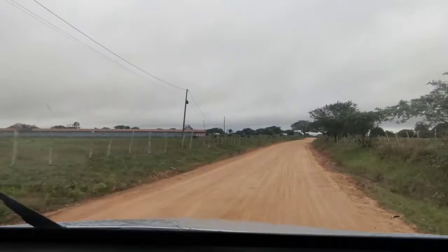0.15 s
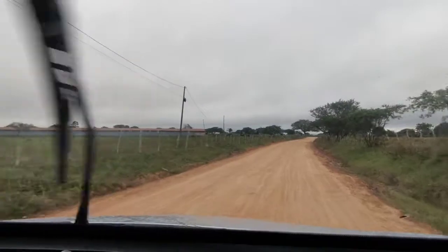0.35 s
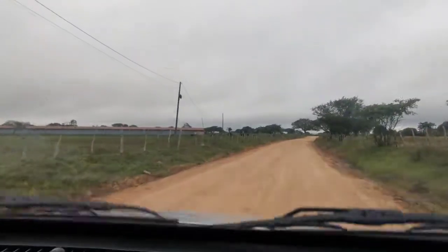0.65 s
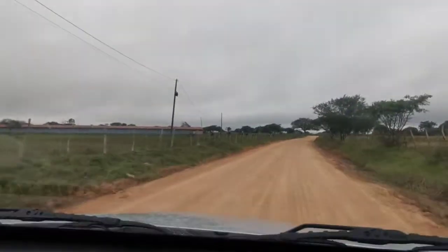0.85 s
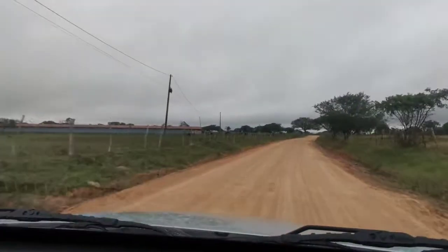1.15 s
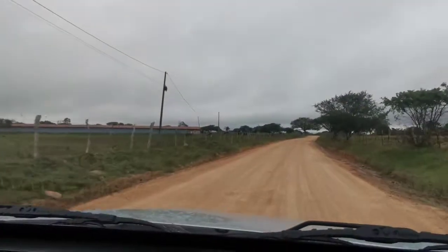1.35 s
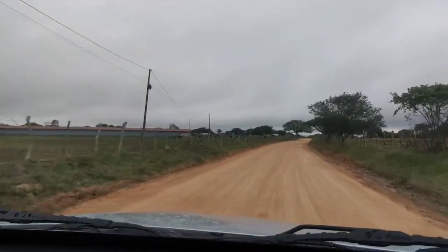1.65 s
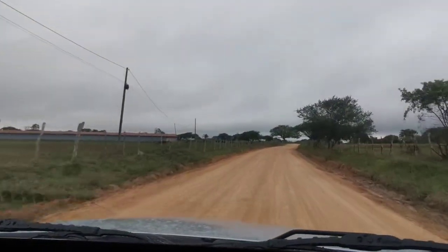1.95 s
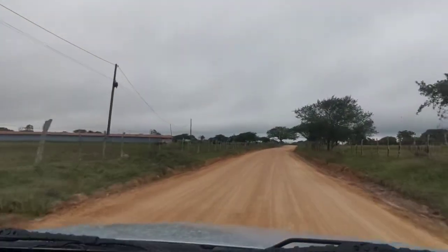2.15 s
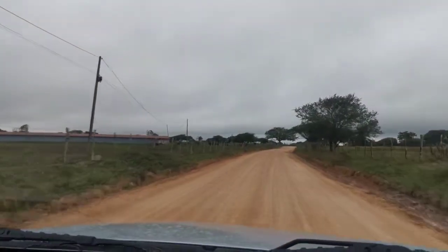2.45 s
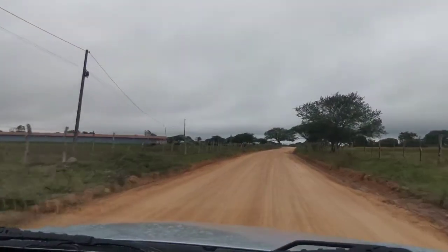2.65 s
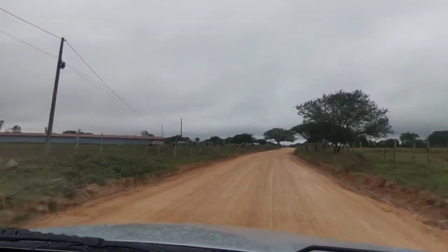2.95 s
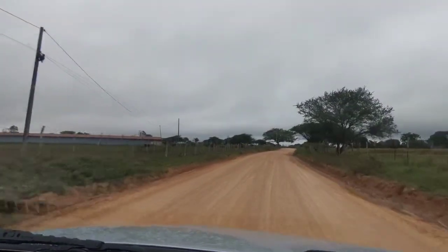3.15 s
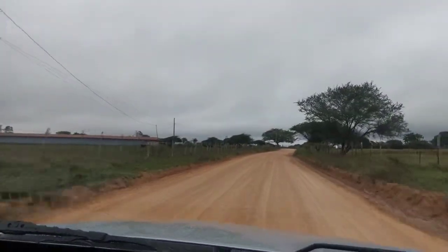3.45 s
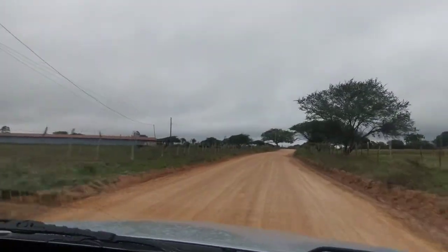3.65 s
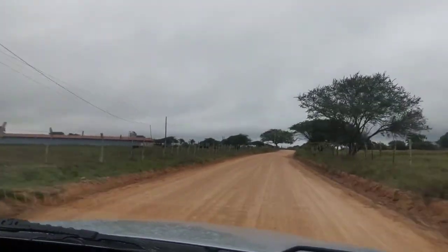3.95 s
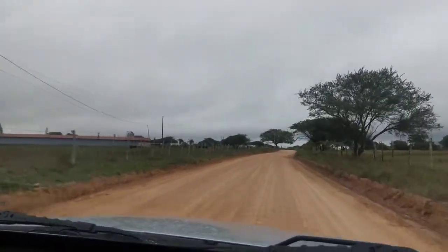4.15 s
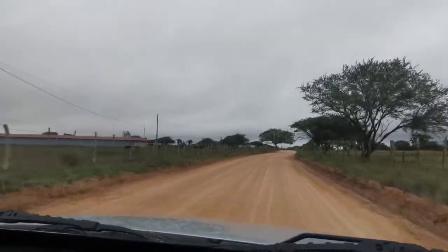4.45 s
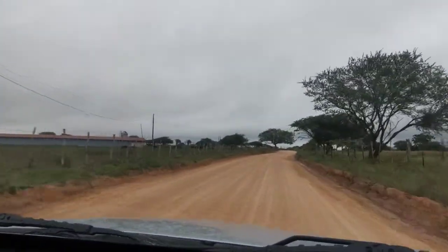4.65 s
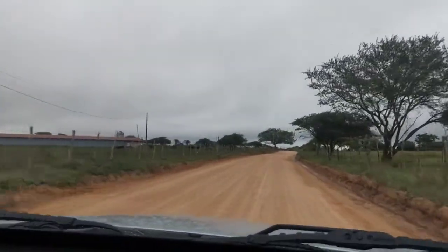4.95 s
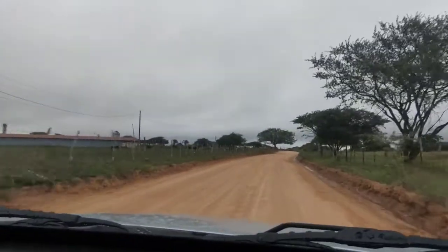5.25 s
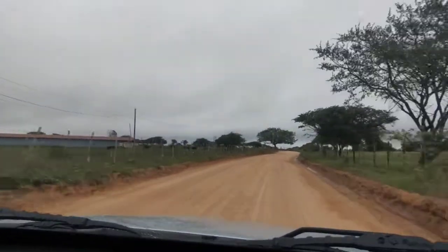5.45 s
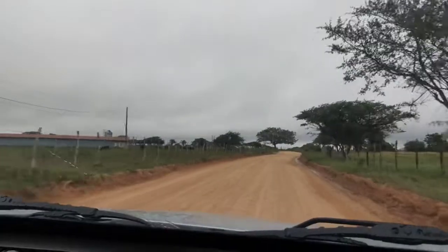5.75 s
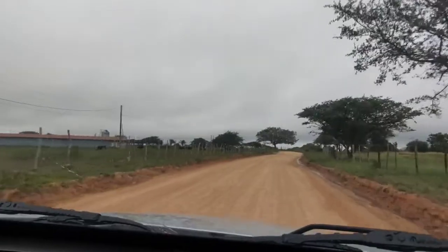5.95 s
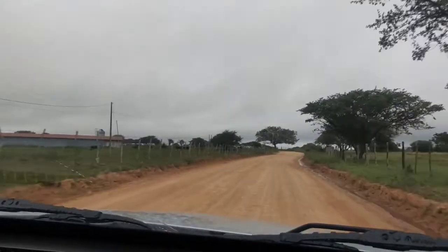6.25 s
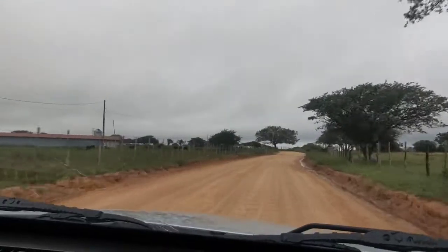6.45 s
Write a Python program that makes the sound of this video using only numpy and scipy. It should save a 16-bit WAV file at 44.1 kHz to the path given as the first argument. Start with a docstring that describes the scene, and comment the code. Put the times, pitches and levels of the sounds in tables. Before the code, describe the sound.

Inside a car on a dirt road, a wiper squeaks and stops with a snap, then low rumble grows into banging, chattering rattles.

```python
"""Car on a washboard road

Inside a car that rolls from smooth dirt onto washboard ripples. Coloured noise, louder on rough dirt,
makes the road boom, roar and fizz. Fading tones make the bumps, the knocks and the ring of a loose piece
of trim that chatters. Short puffs of noise make ticks, wiper squeaks and, with tones, a switch snap.
"""
import sys
import numpy as np
from scipy import signal
from scipy.fft import rfft, irfft
from scipy.io import wavfile
from scipy.ndimage import uniform_filter1d

SR = 44100
rng = np.random.default_rng(int(sys.argv[2]) if len(sys.argv) > 2 else 0)


def unload_audio(sound):
    """Save the sound as a 16-bit wav file, at the path given as the first command line argument."""
    columns = np.transpose(np.atleast_2d(sound))
    # keep every value between -1 and 1, then stretch to whole-number steps
    steps = np.round(np.clip(columns, -1, 1) * 32767)
    wavfile.write(sys.argv[1], SR, steps.astype(np.int16))


N = 291060


def amp(db):
    """Turns decibels into a plain loudness factor."""
    return 10 ** (np.asarray(db) / 20)


def evened(x):
    """Scales a sound to a mean (RMS) level of 1."""
    return x / np.sqrt(np.mean(x ** 2) + 1e-20)


def peaked(x, db):
    """Scales a sound so that its highest peak has this level."""
    return amp(db) * x / abs(x).max()


def read(points, hz):
    """Reads a curve between its points, with pitch spaced as the ear hears it (logarithmic)."""
    point_hz, value = np.transpose(points)
    return np.interp(np.log(hz + 1), np.log(point_hz + 1), value)


def add(mix, s, sound):
    """Lays a sound into the mix from second s on and cuts what runs past the end."""
    part = mix[:, round(s * SR):][:, :sound.shape[1]]
    part += sound[:, :part.shape[1]]


def colour(x, points):
    """Filters a sound by a spectrum in dB."""
    n = x.shape[-1]
    return irfft(rfft(x) * amp(read(points, np.fft.rfftfreq(n, 1 / SR))), n)


def burst(spectrum, t60, rise_s, alike):
    """A short puff of coloured noise, partly shared by both sides; it fades by 60 dB in t60 seconds."""
    t = np.arange(4096) / SR
    left, other = rng.standard_normal((2, 4096))
    alike = np.clip(alike, -1, 1)
    right = alike * left + np.sqrt(1 - alike ** 2) * other
    noise = colour(np.array([left, right]), spectrum)
    return noise * amp(-60 * t / t60) * -np.expm1(-t / rise_s)


def rings(modes, rise_s, spread_db):
    """A struck part rings its modes, a little differently at each blow; each side hears its own mix."""
    t = np.arange(2048) / SR
    hz, width_hz, *side_db = np.transpose(modes)[:, :, None]
    lag_s = np.array([.00045, 0])[:, None, None]  # the left side lies farther away
    size = amp(np.array(side_db) + spread_db * rng.standard_normal(hz.shape))
    fade = np.exp(-np.pi * width_hz * t)  # a wider mode dies sooner
    blow_hz = hz * rng.normal(1, .008, hz.shape)
    tones = size * fade * np.sin(2 * np.pi * blow_hz * (t - lag_s))
    return tones.sum(1) * -np.expm1(-t / rise_s)


def surge(t, s, length, db, tail):
    """Sum of bell-shaped swells in dB, one for each event; the falling side is stretched by tail."""
    late = (t[:, None] - s) / (length / 2)
    late = np.where(late > 0, late / tail, late)
    return (db * np.exp(-late ** 2)).sum(1)


# how rough the dirt is along the way: time_s, roughness_db
ROUGHNESS = [(0, -1.5), (1.3, 1), (1.95, 3.5), (2.25, 5.5), (2.95, 8), (3.5, 9.5), (4.35, 10), (4.9, 17),
             (5.7, 13), (6.6, 18)]
# ridges that shake the whole car: crest_s, length_s, bass_surge_db, treble_surge_db
JOLTS = [(2.124, 0.065, 4, 4), (2.428, 0.19, 6.5, 13.5), (2.759, 0.16, 6.5, 12.5), (3.083, 0.17, 5, 9.5),
         (3.345, 0.18, 2.5, 3), (3.633, 0.11, 7.5, 10.5), (3.736, 0.13, 3.5, 10), (3.954, 0.1, 5.5, 4.5),
         (4.074, 0.1, 0.5, 5.5), (4.171, 0.15, 8, 5), (4.462, 0.099, 4.5, 7), (4.797, 0.23, 2, 6.5),
         (5.098, 0.52, -2, 2.5), (5.358, 0.28, -1, 3), (5.594, 0.11, 5, 4), (5.83, 0.11, 3, 2),
         (6.101, 0.14, 2.5, 10), (6.262, 0.19, -1, 5.5), (6.59, 0.091, 1, 11)]
JOLT_TAIL = 1.3  # a surge falls this many times slower than it rises
# drag of the wiper blade over the glass: crest_s, length_s, surge_db
WIPER_DRAG = [(0.057, 0.27, 10), (0.29, 0.145, 6.5), (0.55, 0.45, 4), (0.222, 0.041, 3.5), (.85, 0.2, 12)]


def shaking(t):
    """The controls of the road noise: roughness, bass surge, treble surge and wiper drag, in dB."""
    s, length, bass_db, treble_db = np.transpose(JOLTS)
    return np.array([np.interp(t, *np.transpose(ROUGHNESS)),
                     surge(t, s, length, bass_db, JOLT_TAIL),
                     surge(t, s, length, treble_db, JOLT_TAIL),
                     surge(t, *np.transpose(WIPER_DRAG), tail=0.8)])


# how alike the noise is on both sides: pitch_hz, likeness (1 same, 0 unrelated, below 0 opposed)
SIDE_LIKENESS = [(40, 0.97), (130, 0.99), (290, 0.79), (640, 0.15), (1410, -0.074), (3100, -0.099),
                 (6820, 0.26), (15000, -0.44)]
# patches and flicker shrink to this share on smooth dirt and are full on dirt this rough
CALM_SHARE, CALM_DB = .3, 9


def wash(spectrum, law, patchy_db, flicker_db, size):
    """Two-channel noise with random patches and a flicker shared by all pitches, its level set by shaking."""
    frames, hz = 4 * N // size + 5, np.fft.rfftfreq(size, 1 / SR)
    a, b, c, d, patches = rng.standard_normal((frames, len(hz), 5)).T
    patches = uniform_filter1d(uniform_filter1d(patches, size=6, axis=0), size=6, axis=1)
    patches = evened(patches)
    flicker = evened(uniform_filter1d(rng.standard_normal(frames), size=3))
    same = np.clip(read(SIDE_LIKENESS, hz), -1, 1)[:, None]
    left = a + 1j * b
    right = same * left + np.sqrt(1 - same ** 2) * (c + 1j * d)
    frame_s = np.arange(frames) * size / 4 / SR
    rough = np.clip(np.interp(frame_s, *np.transpose(ROUGHNESS)) / CALM_DB, CALM_SHARE, 1)
    unrest_db = rough * (patchy_db * patches + flicker_db * flicker)
    z = np.array([left, right]) * amp(read(spectrum, hz)[:, None] + unrest_db)
    noise = evened(signal.istft(z, nperseg=size, noverlap=size - size // 4)[1][:, :N])
    t = np.arange(0, N + 128, 128) / SR
    level_db = law[0] + np.dot(law[1:], shaking(t))
    return noise * amp(np.interp(np.arange(N) / SR, t, level_db))


# colours of the road noise, from the deepest layer to the brightest: pitch_hz, level_db (per Hz, relative)
HEAVE = [(15, -64), (38, -5.5), (53, -6), (64, -13), (113, -2), (135, -8), (180, -16.5), (300, -90)]
BOOM = [(90, -16.5), (130, -7), (158, -11.5), (171, -0.5), (184, -7.5), (240, -8), (290, -18), (340, -21),
        (500, -79)]
ROAR = [(150, -38), (270, 0.5), (400, -5.5), (550, -9), (760, -12), (950, -21), (1300, -27), (2500, -64)]
BUZZ = [(530, -33), (900, -12), (1050, -11), (1400, 2), (1900, -6.5), (2450, -4.5), (3200, -12),
        (4200, -15), (5500, -29), (9000, -64)]
FIZZ = [(2700, -8), (4500, -5), (7000, -5.5), (9200, -6.5), (10400, -5.5), (12300, -9), (13500, -18),
        (14800, -15), (15800, -59)]
# how each layer follows the shaking: base_level_db, then the shares (no unit) of
# roughness, bass_surge, treble_surge, wiper_drag
HEAVE_LAW = (-31.5, 0.8981, 0.95, -0.2039, 0.44)
BOOM_LAW = (-32.5, 0.9391, 0.98, 0.0623, -0.1)
ROAR_LAW = (-45.5, 1.0222, 0.73, 0.3872, 0.41)
BUZZ_LAW = (-58.5, 0.79, 0, 1.05, 0.89)
FIZZ_LAW = (-66.5, 0.6032, -0.36, 1.06, 0.63)
SWISH_DB, SWISH_END_S = 3.5, 0.91  # the fizz is louder while the blade sweeps, the buzz by half as many dB


def road():
    """Heave, body boom, tyre roar, buzzing panels and fizz follow the rough dirt, jolts and wiper drag."""
    swish_db = SWISH_DB * np.clip((SWISH_END_S - np.arange(N) / SR) * 10, 0, 1)
    heave = wash(HEAVE, HEAVE_LAW, patchy_db=0.46, flicker_db=0.36, size=4096)
    boom = wash(BOOM, BOOM_LAW, patchy_db=1.1, flicker_db=1.8, size=8192)
    roar = wash(ROAR, ROAR_LAW, patchy_db=.5, flicker_db=1.1, size=512)
    buzz = wash(BUZZ, BUZZ_LAW, patchy_db=4.0, flicker_db=0.5, size=256) * amp(swish_db / 2)
    fizz = wash(FIZZ, FIZZ_LAW, patchy_db=2.0, flicker_db=3.0, size=256) * amp(swish_db)
    return heave + boom + roar + buzz + fizz


JUDDER_PER_S, JUDDER_DB = 170, -56.5  # slips of the dragging blade; level before drag and chance add to it


def judder():
    """The dragging blade slips unevenly: small dull cracks that swell with the drag."""
    step_s = .002
    out, t = np.zeros((2, N)), np.arange(0, 1, step_s)
    luck, size = rng.random((len(t), 2)).T
    drag_db = shaking(t)[3]
    peak_db = JUDDER_DB + drag_db + 10 * size ** 2
    slips = (luck < JUDDER_PER_S * step_s) & (drag_db > 5)
    for s, db in np.transpose([t, peak_db])[slips]:
        crack = peaked(burst(BUZZ, t60=0.018, rise_s=0.00089, alike=0.25), db)
        dull = peaked(burst(ROAR, t60=0.047, rise_s=0.0019, alike=0.67), db + 9)
        add(out, s, crack + dull)
    return out


# squeaks of wiper rubber on glass, later of rubbing trim:
# start_s, peak_db, pitch_hz, width_hz, fade_s (time to fade by 60 dB)
SQUEAKS = [(0.004, -42, 7800, 4500, .2), (0.05, -39.5, 7940, 2900, 0.11), (.112, -31.5, 8000, 1600, 0.032),
           (0.307, -34.5, 10400, 2963, 0.088), (.335, -44, 9900, 7020, 0.037),
           (0.429, -38, 10550, 6156, 0.02), (.758, -36, 7700, 1200, 0.022),
           (0.773, -31.5, 7600, 2484, 0.06), (0.795, -29.5, 9600, 3500, 0.047),
           (.812, -29.5, 9800, 3300, 0.044), (0.835, -29.5, 2480, 690, 0.022),
           (0.863, -37, 2360, 600, 0.087), (0.881, -37.5, 2940, 14000, 0.019),
           (0.051, -35.5, 2030, 972, 0.045), (0.174, -36.5, 1500, 1700, 0.018),
           (0.295, -38, 1500, 4200, 0.032), (1.68, -43, 1970, 2808, 0.04), (4.17, -39, 905, 30, .6),
           (4.242, -39, 913, 30, .6), (4.865, -25.5, 1566, 260, 0.031), (5.885, -30, 1650, 290, 0.056),
           (6.474, -28, 1358, 39.96, 0.078)]
# the switch and its rebounds: start_s, peak_db (of the noise part)
SNAPS = [(1.0925, -28), (1.0948, -12.5), (1.107, -27), (1.1139, -27), (1.124, -41), (1.134, -40)]
# colour of the switch noise: pitch_hz, level_db (per Hz, relative)
SWITCH = [(700, -40), (1100, -14.5), (1800, -12.5), (2300, -3), (3000, -9.5), (4800, -13.5), (10600, -9.5),
          (14500, -23), (15600, -36)]
# ringing body of the switch: pitch_hz, width_hz, left_db, right_db (relative)
SWITCH_BODY = [(256, 115, -5, 4), (364, 104, 4, 2.5), (607, 73, 3, 3), (2280, 230, 3, -5)]


def wiper():
    """Squeaks are narrow puffs of noise; the switch is a broad snap that rebounds and rings its body."""
    out, f = np.zeros((2, N)), np.geomspace(100, 20000, 300)
    for s, db, hz, width_hz, t60 in SQUEAKS:
        squeak = np.transpose([f, -18 * np.log10(1 + (2 * (f - hz) / width_hz) ** 4)])
        add(out, s, peaked(burst(squeak, t60, rise_s=0.0064, alike=0.41), db))
    for s, db in SNAPS:
        add(out, s, peaked(burst(SWITCH, t60=.03, rise_s=.0015, alike=.3), db))
        add(out, s, peaked(rings(SWITCH_BODY, rise_s=0.0027, spread_db=2.0), db - 1.5))
    return out


STIR_DB, LIGHT_SPREAD_DB = 6, 3  # faint ticks need dirt rougher than this; their levels vary up and down


def scattered(per_s, db):
    """Chance events on rough dirt, stronger where the car shakes more: rows of start_s, peak_db."""
    t = np.arange(0, N / SR, .01)
    luck, place = rng.random((len(t), 2)).T
    rough_db, bass_db, treble_db, drag_db = shaking(t)
    peak_db = db + rough_db + .5 * treble_db + LIGHT_SPREAD_DB * (2 * place - 1)
    chosen = (luck < per_s / 100) & (rough_db > STIR_DB)
    return np.transpose([t, peak_db])[chosen].tolist()


# bright ticks of small parts: start_s, peak_db (of the first touch)
TICKS = [(2.018, -46), (2.7102, -32.5), (2.746, -32.5), (3.4223, -37), (3.62, -35), (3.658, -33.5),
         (3.7185, -33), (4.0593, -32.5), (4.7591, -32.5), (4.792, -29), (4.836, -37), (4.8686, -28),
         (4.9968, -28.5), (5.0778, -39), (5.208, -34.5), (5.291, -37), (5.4654, -28), (5.4964, -34),
         (5.557, -37.5), (5.5817, -31.5), (5.8865, -29), (5.9194, -43), (5.9908, -40), (6.051, -31.5),
         (6.1087, -27.5), (6.1813, -37), (6.2562, -40), (6.321, -35), (6.4845, -36)]
FAINT_PER_S, FAINT_DB = 8, -62  # chance ticks; level before the shaking adds to it
# a tick's touches spread this long, fade up to this much and differ in colour
JINGLE_S, JINGLE_DB, JINGLE_TINT_DB = .024, -6, 4


def ticks():
    """Hard little parts jingle together: a few quick puffs of bright noise, each with its own colour."""
    out, (hz, level_db) = np.zeros((2, N)), np.transpose(FIZZ)
    for s, db in list(TICKS) + scattered(FAINT_PER_S, FAINT_DB):
        for late in np.append(0, rng.random(size=3)):
            tint = np.transpose([hz, level_db + JINGLE_TINT_DB * rng.standard_normal(len(hz))])
            touch = burst(tint, t60=.033, rise_s=.0022, alike=.05)
            add(out, s + JINGLE_S * late, peaked(touch, db + JINGLE_DB * late))
    return out


# stones and ridges under the wheels, and the wiper arm coming to rest:
# start_s, level_db (5.5 dB above the peak that is played), pitch_hz
BUMPS = [(0.821, -14.5, 117), (0.876, -20, 112), (1.117, -18.5, 122), (1.441, -15, 174),
         (2.381, -3.5, 158.5), (2.73, -2.5, 103), (3.36, -15, 154), (3.611, -13, 142), (4.173, -5, 177.4),
         (4.426, -6.5, 186), (4.985, -2.5, 165), (5.267, -7, 163), (5.658, -3, 174), (5.927, -8, 183),
         (6.133, -1, 166), (6.446, -5, 146), (2.092, -6, 164.7), (2.342, 2, 187.2), (2.98, -5, 200),
         (4.479, -1, 179), (3.641, -8.5, 150), (4.771, -12, 150), (5.087, 2.5, 177.2), (5.22, -7, 170),
         (6.173, -1, 166), (6.37, 1, 192.5)]


def bumps():
    """Each bump rings the floor pan for a few cycles: one low tone that fades fast, same on both sides."""
    out, t = np.zeros((2, N)), np.arange(8192) / SR
    for s, db, hz in BUMPS:
        ring = np.sin(2 * np.pi * hz * t) * amp(-60 * t / 0.074) * -np.expm1(-t / 0.0067)
        add(out, s, peaked(ring * np.ones((2, 1)), db - 5.5))
    return out


# hard knocks that the wiper arm and the suspension pass into the dashboard: start_s, peak_db
KNOCKS = [(0.793, -26), (.838, -26.5), (0.886, -32), (2.415, -18.5), (2.714, -22), (2.731, -16.5),
          (2.751, -16.5), (3.082, -23), (3.315, -21), (3.632, -12), (3.719, -17), (3.918, -29),
          (4.192, -18.5), (4.452, -18.5), (4.783, -12), (5.131, -14.5), (5.312, -16), (5.631, -20),
          (5.828, -23), (6.081, -12.5), (6.233, -14.5), (6.517, -18)]
# higher, hollow knocks of the upper dashboard: start_s, peak_db
CLUNKS = [(.097, -28), (.92, -32), (1.812, -34), (2.428, -26), (3.422, -23.5), (3.614, -15.5),
          (6.041, -17.5), (6.124, -17), (6.333, -20)]
# ringing modes of the dashboard: pitch_hz, width_hz, left_db, right_db (relative)
DASHBOARD = [(327.3, 25, -3.5, 2.5), (433, 46, 0.5, -2), (580, 49, -12, -3.5), (726, 55, -6.5, -11)]


def knocks():
    """Each knock rings the dashboard briefly; the hollow ones ring only its upper modes."""
    out = np.zeros((2, N))
    for events, modes in ((KNOCKS, DASHBOARD), (CLUNKS, DASHBOARD[2:])):
        for s, db in events:
            add(out, s, peaked(rings(modes, rise_s=.0015, spread_db=3), db))
    return out


# strong blows of the loose trim: start_s, nominal_peak_db (BLOW_CREST_DB sets the mean level below it)
CHATTER = [(2.186, -38), (2.2935, -37.5), (2.3543, -21), (2.423, -34), (2.4982, -33), (2.5461, -29.5),
           (2.7125, -21.5), (2.743, -21), (2.7971, -27.5), (2.8548, -32.5), (2.9922, -26), (3.041, -36),
           (3.0744, -25.5), (3.113, -26.5), (3.1486, -32.5), (3.2442, -29.5), (3.278, -26), (3.3116, -34),
           (3.3464, -26.5), (3.4257, -30.5), (3.614, -29.5), (3.6539, -38), (3.69, -38), (3.7257, -24.5),
           (3.7688, -22.5), (3.8073, -22.5), (3.8862, -30.5), (4.1155, -23), (4.154, -27), (4.189, -23.5),
           (4.3685, -29), (4.4134, -35), (4.4442, -23), (4.487, -23), (4.535, -22), (4.577, -26),
           (4.62, -23), (4.6674, -23.5), (4.726, -25), (4.7507, -28.5), (4.7915, -21.5), (4.8266, -30),
           (4.8618, -29), (4.867, -29), (4.92, -29), (4.934, -26), (4.9776, -24.5), (5.0048, -25.5),
           (5.0748, -26.5), (5.129, -27.5), (5.1516, -24), (5.178, -30), (5.222, -19.5), (5.2631, -26),
           (5.3465, -29.5), (5.386, -26.5), (5.4443, -27.5), (5.491, -26.5), (5.5512, -34), (5.589, -21.5),
           (5.6338, -23.5), (5.663, -24.5), (5.723, -21.5), (5.7588, -26.5), (5.8028, -31.5),
           (5.8406, -20.5), (5.8895, -25.5), (5.8965, -23.5), (5.9198, -35), (5.9572, -30), (6.0113, -27.5),
           (6.0623, -31), (6.0868, -26), (6.102, -21), (6.1378, -23), (6.1812, -28), (6.2184, -27.5),
           (6.256, -26.5), (6.3014, -31), (6.3355, -28), (6.3774, -28), (6.4034, -32), (6.4375, -25.5),
           (6.479, -26), (6.511, -24), (6.5537, -27.5)]
# ringing modes of the trim: pitch_hz, width_hz, left_db, right_db (relative)
TRIM = [(1390, 260, -10, 23.5), (1343, 44, 9.5, 8), (1540, 110, -15, 11), (1650, 35, 3.5, 4.5),
        (2135, 60, 8, -6), (2335, 54, 0.5, 9.5), (2476, 62, 9, 1), (2670, 60, 7.5, -6), (2600, 2000, 6, 12),
        (3180, 57, 1, 4), (3450, 66, 8.5, 2), (3925, 87, 7, 5), (4047, 49, 4.5, -2), (4293, 57, -3, -4)]
# colour of the crack in each blow: pitch_hz, level_db (per Hz, relative)
CRACK = [(700, -15), (1150, -0.5), (1400, 3.5), (1900, -5), (2500, -2), (4200, -6.5), (5200, -17.5),
         (12000, -48), (15500, -70)]
BLOW_CREST_DB = 14  # nominal peak of a blow over its mean level


def chatter():
    """Every blow rings the same modes, adds a crack that the cabin smears, and rebounds once."""
    out = np.zeros((2, N))
    for s, peak_db in CHATTER:
        rebound = (rng.uniform(0.004, 0.015), -9 - 4 * rng.random())  # later and softer
        for late_s, down_db in ((-.0003, 0), rebound):
            ring = rings(TRIM, rise_s=.0005, spread_db=2)
            crack = burst(CRACK, t60=.036, rise_s=.0008, alike=.1)[:, :ring.shape[1]]
            blow = evened(evened(ring) + amp(-4) * evened(crack))
            add(out, s + late_s, amp(peak_db + down_db - BLOW_CREST_DB) * blow)
    return out


def scene():
    """All the sounds in the car, added together."""
    return road() + judder() + wiper() + ticks() + bumps() + knocks() + chatter()


# how the two microphone ports differ: pitch_hz, left_minus_right_db
PORT_LEAN = [(60, 0), (200, -1.5), (500, -0.4), (1300, 0.3), (2400, 1), (4000, -0.5), (6000, 4.5),
             (8000, 8), (10000, -6), (12500, -16), (15000, -11)]
EDGE_HZ = 15750  # upper band limit


def record(dry):
    """The microphone loses the deepest bass, its two ports hear the treble differently; then the band limit."""
    hz = np.fft.rfftfreq(N, 1 / SR)
    lean_db = read(PORT_LEAN, hz) / 2  # half the difference goes to each side
    bass_cut = hz ** 4 / (hz ** 4 + 52.6 ** 4)
    ports = irfft(rfft(dry) * amp([lean_db, -lean_db]) * bass_cut, N)
    band_limit = signal.firwin(511, EDGE_HZ, window=("kaiser", 9), fs=SR)
    return signal.oaconvolve(ports, band_limit[None], "same")


dry = scene()
out = record(dry)
unload_audio(out)
```